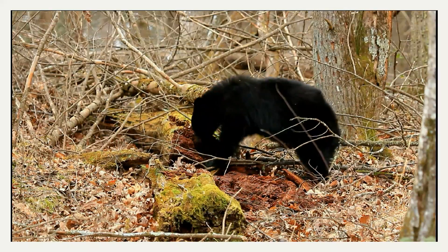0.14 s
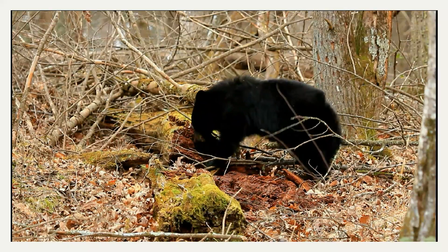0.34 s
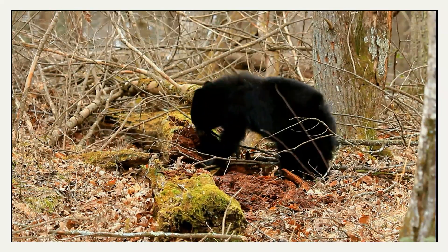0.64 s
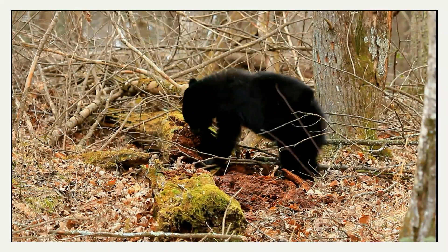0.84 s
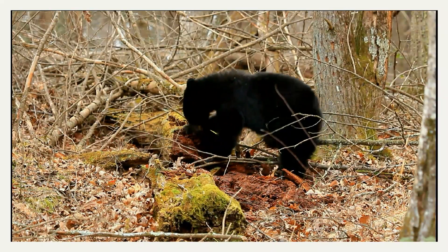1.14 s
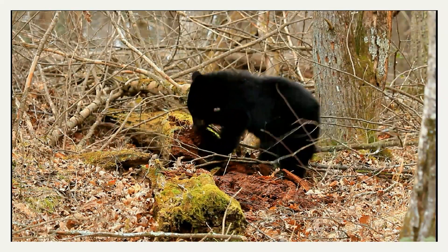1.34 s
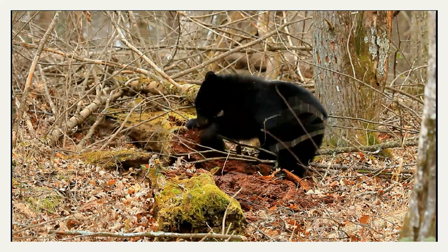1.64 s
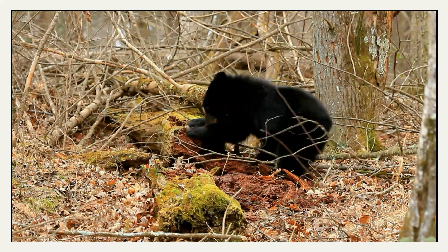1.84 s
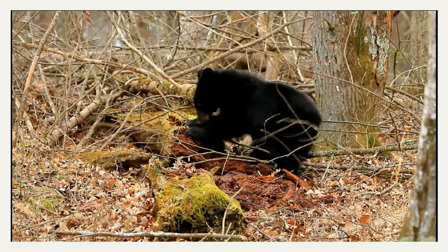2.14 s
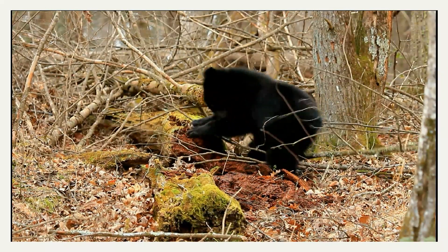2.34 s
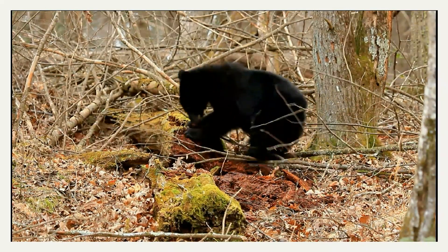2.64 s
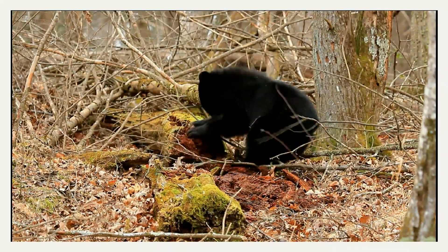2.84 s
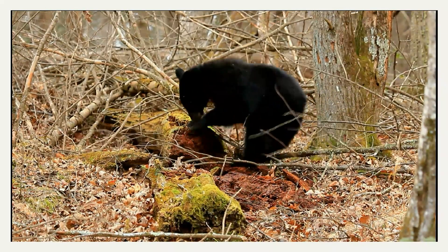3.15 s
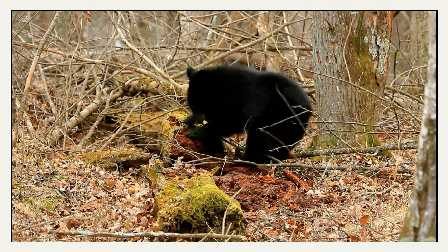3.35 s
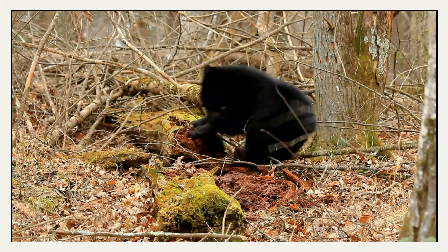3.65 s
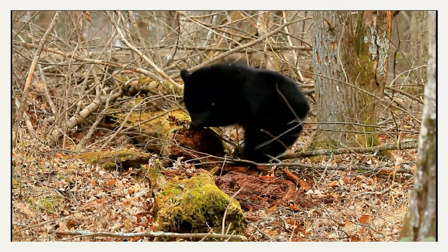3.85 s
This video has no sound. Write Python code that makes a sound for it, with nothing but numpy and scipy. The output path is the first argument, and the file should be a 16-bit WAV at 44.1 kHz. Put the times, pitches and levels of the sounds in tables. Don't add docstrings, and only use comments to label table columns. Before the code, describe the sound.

Three dry wood cracks, the last loudest and brightest, follow soft rustling of leaves and bark in a leafless forest. A distant bird calls with echo, and gusts finally buffet the unprotected outdoor microphone.

```python
import sys
import numpy as np
from scipy import signal
from scipy.io import wavfile

SR = 44100
rng = np.random.default_rng(int(sys.argv[2]) if len(sys.argv) > 2 else 0)


def convert_level_to_amplitude(level_db):
    exponent = np.asarray(level_db, float) / 20
    return 10 ** exponent


def persist_wave(psi):
    counts = np.round(np.clip(psi, -1, 1) * 32767).astype(np.int16)
    wavfile.write(sys.argv[1], SR, np.atleast_2d(counts).T)


N = 176400

# peak t/s, level/dB, rise/s, fade/s per 20 dB
SCUFFS = [(.12, -63, .03, .1), (.42, -62, .03, .1), (.73, -57, .02, .15), (.98, -56, .06, .25),
          (1.32, -51, .01, .15), (1.385, -44, .012, .25), (1.425, -42, .09, .16), (1.52, -50, .05, .12),
          (1.97, -50, .08, .5), (2.26, -54, .1, .1), (2.49, -53, .3, .3), (3.04, -52, .5, .1),
          (3.3, -56, .3, .2), (3.7, -53, .2, .5), (3.92, -57, .03, .1)]
# f/Hz, density/dB per Hz
RUSTLE_SPECTRUM = [(900, -16), (1500, -9), (2500, -6), (3800, 0), (5500, -2), (8000, -11), (12000, -26),
                   (16000, -42)]
GRAINS_PER_S, GRAIN_SPREAD_DB, GRAIN_SHARE, GRAIN_CYCLES = 1500, 2.5, .4, 6.0

# t/s, peak level/dB, break length/s, splinter level/dB, tail level/dB
SNAPS = [
    (1.6622, -15, 0.0017, -8, -29),
    (1.8074, -14.5, 0.002, -3, -28),
    (1.9298, -8.5, .0006, -16, -34),
]
# f/Hz, level/dB, t60/s
STICK_MODES = [
    [(1120, -12, .008), (1520, 1, .012), (1800, -1, .01), (2140, -5, .009), (3100, -6, .01),
     (3800, -3, .01), (4500, 0, .008), (7900, -3, .007), (13500, -18, .004)],
    [(1625, 9, .04), (2330, -7, .015), (4200, -5, .008), (5050, -3, .008), (5830, -5, .008),
     (7100, -5, .006), (8400, -4, .007), (9800, -9, .005), (11400, -16, .01), (13800, -14, .004)],
    [(2000, -14, .025), (3000, -10, .012), (3860, 7, .008), (4350, 2, .012), (5070, 3, .008),
     (5800, -1, .004), (7200, -12, .004), (10400, -7, .003), (12300, -14, .002), (14800, -8, .0015),
     (16200, -16, .002)],
]
STICK_LOW_HZ = [850, 1350, 1600]
TAIL_T60_S = [0.46, 0.38, 0.63]
# low f/Hz, high f/Hz
TAIL_BAND_HZ = [(1300, 9000), (1500, 9000), (3400, 4500)]
SPLINTER_LOW_HZ, LAST_FIBRE = 3000, 4.5
BRIGHT_TAIL_DB, BRIGHT_T60_S = -45, .35
TRUNKS_DB = 3.0

# t/s, peak
# level/dB, f/Hz, ring t60/s
TICKS = [(.311, -45, 2500, .01), (.597, -41, 6000, .01), (.723, -41, 4000, .012), (1.154, -46, 2200, .01),
         (1.284, -43, 3000, .01), (1.319, -37, 3500, .015), (1.377, -34, 4400, .012),
         (1.514, -34, 5000, .01), (1.623, -29, 4100, .01), (1.626, -33, 2100, .012),
         (1.691, -33, 1670, .013), (1.66, -36, 3800, .012), (1.667, -30, 1600, .01), (1.84, -36, 8000, .02),
         (1.39, -37, 5500, .012), (1.44, -37, 3200, .015), (2.05, -39, 1200, .02),
         (1.9325, -28, 4500, .012), (1.9345, -33, 2200, .01), (1.948, -32, 3900, .01),
         (1.971, -38, 1400, .015), (3.015, -44, 6000, .01), (3.037, -44, 8000, .012),
         (2.02, -38, 6000, .01), (2.25, -42, 4000, .012), (2.46, -48, 1980, .012), (2.885, -29, 1650, .012),
         (3.039, -39, 1610, .013), (3.218, -52, 13000, .01)]

# start t/s, note level/dB, echo level/dB
CALLS = [
    (-.12, -60, -54),
    (1.95, -60, -47),
    (2.694, -45.5, -49.5),
]
CALL_S, CALL_TOP_HZ, CALL_PEAK_AT = .094, 1480, .5
CALL_RISE, CALL_FALL = .36, .22
UNDERTONE_DB, OVERTONE_DB = -15.5, -18
ECHO_T60_S, ECHO_GAP_S = 2.1, .025

# t/s, peak level/dB, f/Hz
EDDIES = [(.955, -28, 95), (1.223, -25, 86), (1.379, -22, 75), (2.474, -19, 81), (2.493, -20, 147),
          (2.966, -27, 71), (3.021, -21, 115), (3.148, -28, 82), (3.166, -15, 78), (3.224, -20, 142),
          (3.254, -26, 92), (3.289, -7, 125), (3.329, -12, 120), (3.342, -14, 121), (3.369, -3, 145),
          (3.381, -15, 110), (3.436, -25, 81), (3.534, -22, 106), (3.599, -10, 94), (3.629, -5, 162),
          (3.658, -9, 122), (3.711, -13, 107), (3.748, -19, 178), (3.769, -27, 87), (3.871, -24, 71),
          (3.898, -27, 75), (3.918, -24, 67), (3.935, -21, 138), (3.964, -24, 108),
          (3.993, -21, 109),
          (0.877, -33, 89), (.93, -32, 97), (1.08, -35, 90), (1.319, -33, 89.5), (1.569, -31.5, 59),
               (1.839, -28.5, 129), (2.022, -32, 59.5), (2.174, -29.5, 78), (2.21, -31, 89),
               (2.427, -32, 45), (2.504, -23, 109), (2.678, -30, 59.4), (2.877, -36, 70), (3.01, -30, 260),
               (3.299, -17, 170), (3.286, -17, 240), (3.314, -23, 170), (3.327, -10.5, 356),
               (3.328, -17.5, 620), (3.327, -31, 830), (3.328, -33, 1020), (3.327, -40, 1220),
               (3.334, -18, 270), (.9, -33, 48), (1.78, -33, 52), (2.66, -33, 45), (2.99, -31, 190),
               (.37, -36, 50), (3.372, -17, 280), (3.382, -22, 250), (3.371, -32, 480), (3.628, -17, 350),
               (3.628, -27, 540), (2.497, -33, 300), (3.62, -18, 70), (3.638, -20, 170), (3.654, -17, 260),
               (3.654, -26, 500), (3.653, -35, 700), (3.668, -22, 350), (3.742, -25, 280),
               (3.619, -16, 210), (3.609, -22, 190), (3.695, -25, 80), (3.647, -10.5, 72),
               (3.667, -14, 170)]
EDDY_CYCLES, EDDY_SHORTEST_S = 1.15, .008
RIPPLE_DB, RIPPLE_RATIO = -14, 2.2
RIPPLE_FADE_HZ = 150
# t/s, level/dB
BREEZE = [(0, -48), (.8, -47), (1.4, -44), (2.0, -44), (2.45, -42), (2.8, -47), (3.1, -42), (3.35, -30),
          (3.5, -40), (3.65, -31), (3.82, -40), (4, -32)]
SWIRLS_PER_S, SWIRL_SPREAD_DB, SWIRL_SHARE = 140, 2.36, .6
SWIRL_LOW_HZ, SWIRL_HIGH_HZ = 20, 115

# f/Hz, density/dB per Hz
AIR_SPECTRUM = [(59, -45), (100, -4.5), (300, -6.5), (965, -12.5), (2250, -21), (4930, -25), (8190, -34),
                (10500, -43), (12800, -45), (15800, -51)]
AIR_DB = -45.5
TOP_CUT_HZ = 16850


def rms_one(x):
    return x / np.sqrt(np.mean(x ** 2) + 1e-20)


def peak_one(x):
    return x / np.abs(x).max()


def in_time(rows):
    return np.interp(np.arange(N) / SR, *np.transpose(rows))


def at_hz(points, hz):
    points_hz, points_db = np.transpose(points)
    return np.interp(np.log(hz), np.log(points_hz), points_db)


def drift(rate_hz):
    r = np.exp(-80 * np.pi * rate_hz / SR)
    white = rng.standard_normal(N // 40 + 2002)
    slow = signal.lfilter([1], [1, -2 * r, r * r], white)[2000:]
    return np.interp(np.arange(N) / 40, np.arange(len(slow)), rms_one(slow))


def ring(clicks, hz, t60_s):
    r, w = convert_level_to_amplitude(-60 / (t60_s * SR)), 2 * np.pi * hz / SR
    return signal.lfilter([0, np.sin(w)], [1, -2 * r * np.cos(w), r * r], clicks + 1e-18)


def band(x, low_hz, high_hz, order=2):
    edges = [low_hz, min(high_hz, .45 * SR)]
    return signal.sosfilt(signal.butter(order, edges, "band", fs=SR, output="sos"), x)


def coloured(spectrum, low_hz, patchy_db):
    out, together, white = np.zeros(N), drift(4.0), rng.standard_normal((2, N))
    edges = low_hz * 2 ** np.arange(0, np.log2(19000 / low_hz), .5)
    for k, (low, high) in enumerate(zip(edges, edges[1:])):
        flicker_db = patchy_db * (0.8 * together + drift(14))
        level_db = at_hz(spectrum, np.sqrt(low * high)) + flicker_db
        out += convert_level_to_amplitude(level_db) * band(white[k % 2], low, high)
    return rms_one(out)


def grains(rate_per_s, spread_db):
    sizes = convert_level_to_amplitude(spread_db * np.minimum(rng.exponential(1, N), 5)) * rng.choice([-1, 1], N)
    return sizes * (rng.random(N) < rate_per_s / SR)


def add(out, s, x):
    i = int(s * SR)
    x = x[max(-i, 0):N - i]
    out[max(i, 0):max(i, 0) + len(x)] += x


def rustle():
    clicks = grains(GRAINS_PER_S * convert_level_to_amplitude(3.3 * drift(15)), GRAIN_SPREAD_DB)
    dealt = rng.integers(0, 16, N)
    crackle = np.zeros(N)
    for k, hz in enumerate(np.geomspace(1200, 9000, num=16)):
        crackle += convert_level_to_amplitude(at_hz(RUSTLE_SPECTRUM, hz)) * hz * ring(clicks * (dealt == k), hz, GRAIN_CYCLES / hz)
    brushing = coloured(RUSTLE_SPECTRUM, 895, patchy_db=2.5)
    mix = np.sqrt(GRAIN_SHARE) * rms_one(band(crackle, 900, 8000)) + np.sqrt(1 - GRAIN_SHARE) * brushing
    t, power = np.arange(N) / SR, np.zeros(N)
    for s, db, rise_s, fade_s in SCUFFS:
        distance = np.where(t < s, (s - t) / rise_s, (t - s) / fade_s)
        power += convert_level_to_amplitude(2 * (db - 20 * distance))
    return np.sqrt(power) * mix


def snaps():
    out, echoes, t = np.zeros(N), np.zeros(N), np.arange(SR // 2) / SR
    rows = zip(SNAPS, STICK_MODES, STICK_LOW_HZ, TAIL_T60_S, TAIL_BAND_HZ)
    for (s, db, length_s, splinter_db, tail_db), modes, low_hz, t60_s, tail_band in rows:
        swell = (t / length_s) ** 2 * np.exp(2 - 2 * t / length_s)
        parting = (rng.random(len(t)) < .15) * (t < 1.5 * length_s)
        fibres = rng.standard_normal(len(t)) * parting * swell
        fibres[int(length_s * SR)] += LAST_FIBRE
        modes_sum = sum(convert_level_to_amplitude(mode_db) * peak_one(ring(fibres, hz, r)) for hz, mode_db, r in modes)
        body = band(modes_sum, low_hz, 18500, order=3)
        hiss = band(rng.standard_normal(len(t)), SPLINTER_LOW_HZ, 10000) * swell ** 2
        tail = rms_one(band(rng.standard_normal(len(t)), *tail_band))
        tail = tail * convert_level_to_amplitude(-60 * t / t60_s) * (1 - np.exp(-t / .008))
        bright = rms_one(band(rng.standard_normal(len(t)), 5500, 11000, order=1))
        bright = bright * convert_level_to_amplitude(BRIGHT_TAIL_DB - 60 * t / BRIGHT_T60_S)
        add(out, s, convert_level_to_amplitude(db) * (peak_one(body) + convert_level_to_amplitude(splinter_db) * hiss))
        add(echoes, s, convert_level_to_amplitude(db) * (convert_level_to_amplitude(tail_db) * tail + bright))
    return out + echoes * convert_level_to_amplitude(TRUNKS_DB * drift(30))


def ticks():
    out, t = np.zeros(N), np.arange(2000) / SR
    for s, db, hz, t60_s in TICKS:
        noise = band(rng.standard_normal(len(t)), .4 * hz, 2.4 * hz)
        crack = noise * convert_level_to_amplitude(-60 * t / t60_s) * (1 - np.exp(-t / 0.00036))
        body = ring(crack, hz, .7 * t60_s)
        add(out, s, convert_level_to_amplitude(db) * (.6 * peak_one(body) + .6 * crack))
    return out


def bird():
    out, u = np.zeros(N), np.arange(int(CALL_S * SR)) / (CALL_S * SR)
    rise = CALL_RISE * np.abs(1 - u / CALL_PEAK_AT) ** 2.3
    fall = CALL_FALL * np.abs((u - CALL_PEAK_AT) / (1 - CALL_PEAK_AT)) ** 2.4
    pitch_hz = CALL_TOP_HZ * (1 - np.where(u < CALL_PEAK_AT, rise, fall))
    phase = np.pi * np.cumsum(pitch_hz) / SR
    partials = convert_level_to_amplitude(UNDERTONE_DB) * np.sin(phase) + np.sin(2 * phase) + convert_level_to_amplitude(OVERTONE_DB) * np.sin(3 * phase)
    note = np.sqrt(2) * signal.windows.tukey(len(u), .3) * (.7 + .4 * u) * partials
    t = np.arange(SR) / SR
    for s, db, echo_db in CALLS:
        trees = rng.standard_normal(SR) * convert_level_to_amplitude(-60 * t / ECHO_T60_S) * np.clip(t / ECHO_GAP_S - 1, 0, 1)
        echo = signal.fftconvolve(note, trees / np.sqrt(np.sum(trees ** 2)))
        add(out, s, convert_level_to_amplitude(db) * note)
        add(out, s, convert_level_to_amplitude(echo_db) * echo)
    return out


def eddies():
    out, t = np.zeros(N), np.arange(-2000, 2000) / SR
    balance = np.hanning(len(t)) * 2 / len(t)
    for s, db, hz in EDDIES:
        swing_turn, ripple_turn, chance = rng.random(3)
        shape = 1 / np.cosh(np.pi * t / max(EDDY_CYCLES / hz, EDDY_SHORTEST_S)) ** 1.5
        ripple_hz = min(RIPPLE_RATIO * (.8 + .4 * chance) * hz, 900)
        ripple_gain = convert_level_to_amplitude(RIPPLE_DB) * min(1, RIPPLE_FADE_HZ / hz) ** 3
        ripple = ripple_gain * shape * np.cos(2 * np.pi * (ripple_hz * t + ripple_turn))
        swing = shape * (np.cos(2 * np.pi * (hz * t + swing_turn)) + ripple)
        add(out, s + t[0], convert_level_to_amplitude(db) * (swing - swing.sum() * balance))
    return out


def rumble():
    lumps = rms_one(grains(SWIRLS_PER_S, SWIRL_SPREAD_DB))
    swirls = np.sqrt(SWIRL_SHARE) * lumps + np.sqrt(1 - SWIRL_SHARE) * rng.standard_normal(N)
    smooth = signal.sosfilt(signal.bessel(3, SWIRL_HIGH_HZ, fs=SR, output="sos"), swirls)
    low = signal.sosfilt(signal.butter(1, SWIRL_LOW_HZ, "high", fs=SR, output="sos"), smooth)
    return convert_level_to_amplitude(in_time(BREEZE)) * rms_one(low)


def air():
    return convert_level_to_amplitude(AIR_DB) * coloured(AIR_SPECTRUM, 75.7, patchy_db=1.1)


def scene():
    log = rustle() + snaps() + ticks()
    return (log + bird() + eddies() + rumble() + air())[None, :]


def band_limit(x):
    return signal.sosfilt(signal.butter(12, 16650, fs=SR, output="sos"), x)


def record(dry):
    top_cut = signal.cheby2(14, 60, TOP_CUT_HZ, fs=SR, output="sos")
    mix = signal.sosfilt(top_cut, dry)
    return band_limit(mix)


dry = scene()
out = record(dry)
persist_wave(out)
```